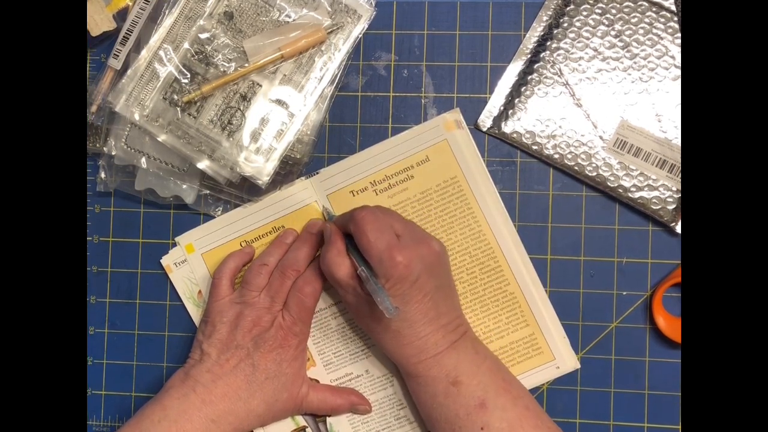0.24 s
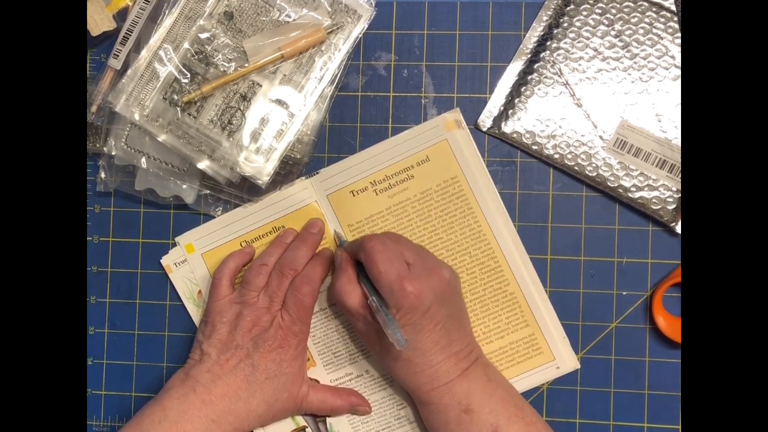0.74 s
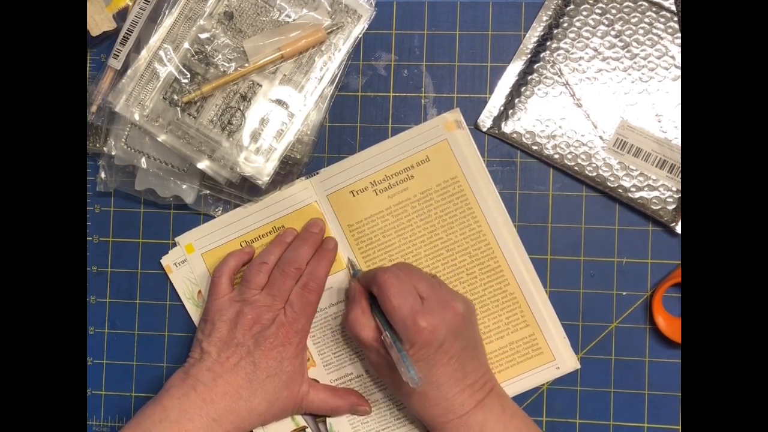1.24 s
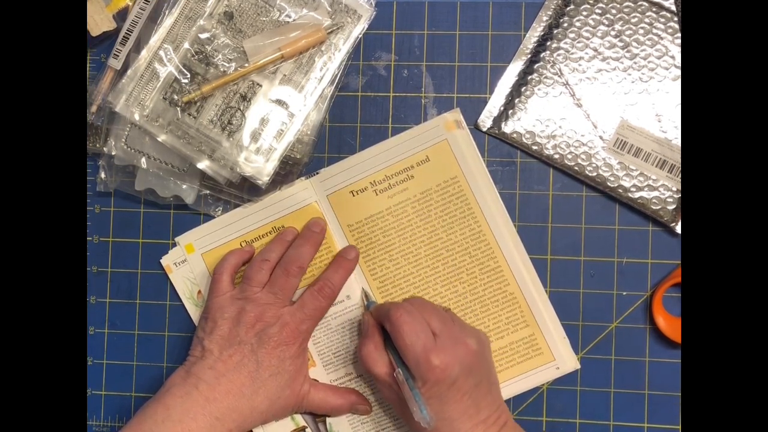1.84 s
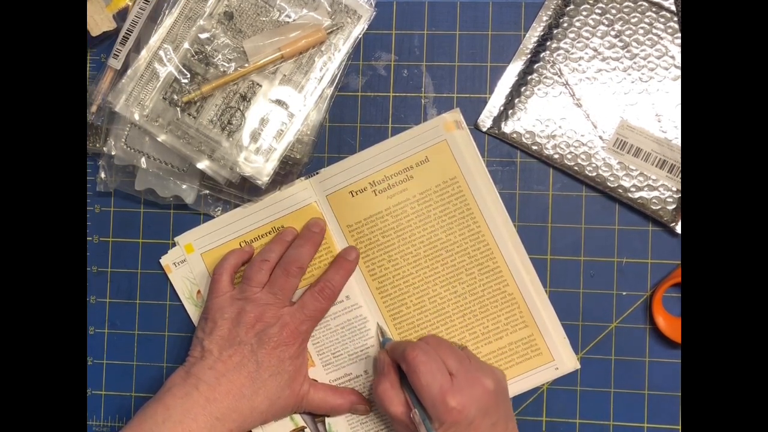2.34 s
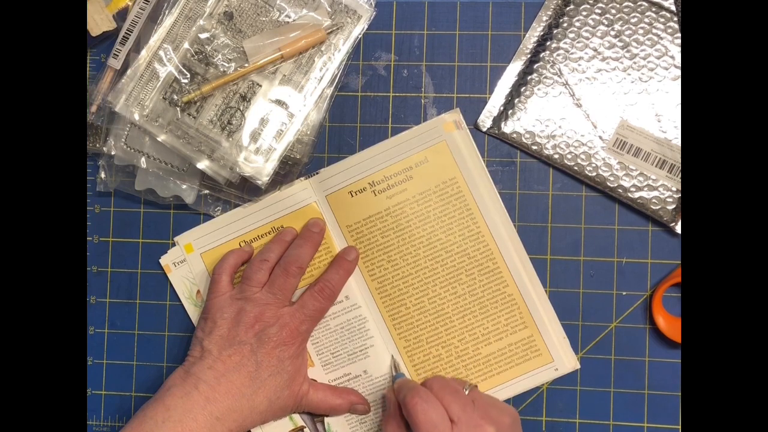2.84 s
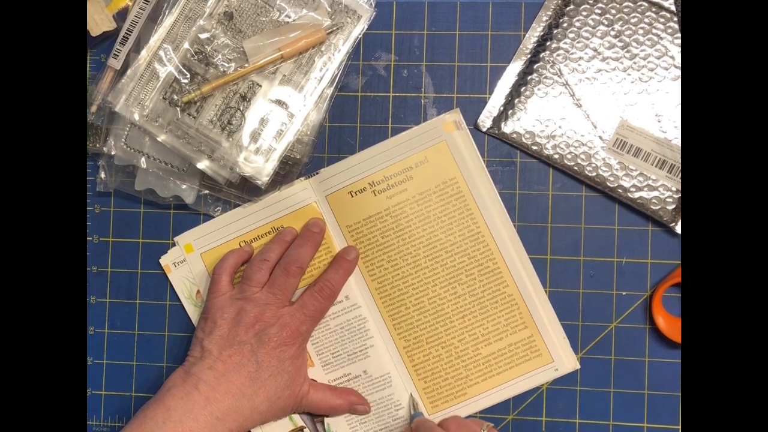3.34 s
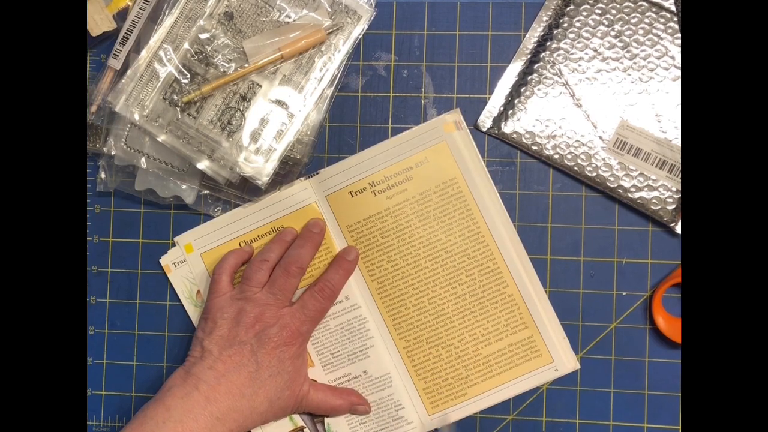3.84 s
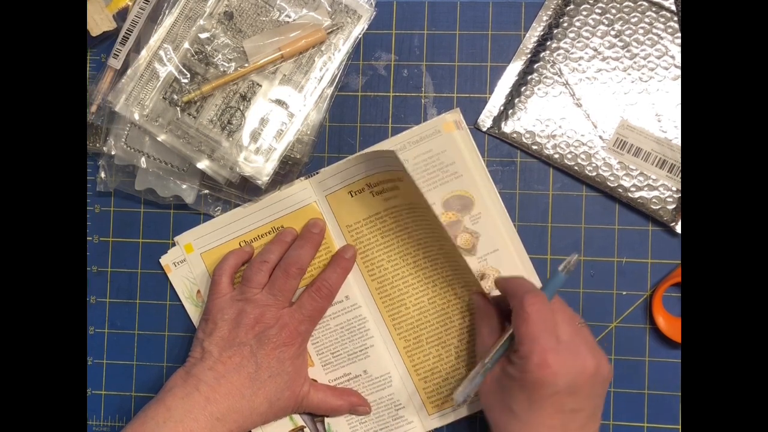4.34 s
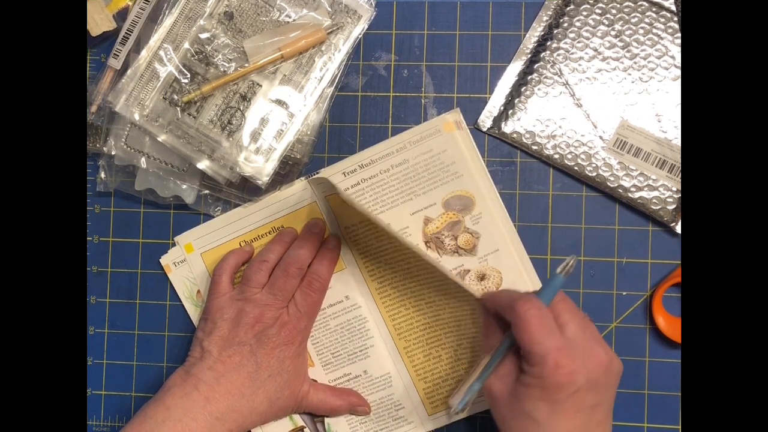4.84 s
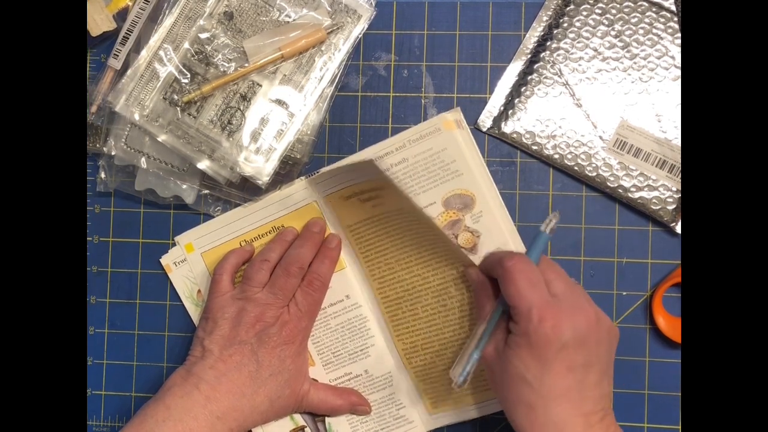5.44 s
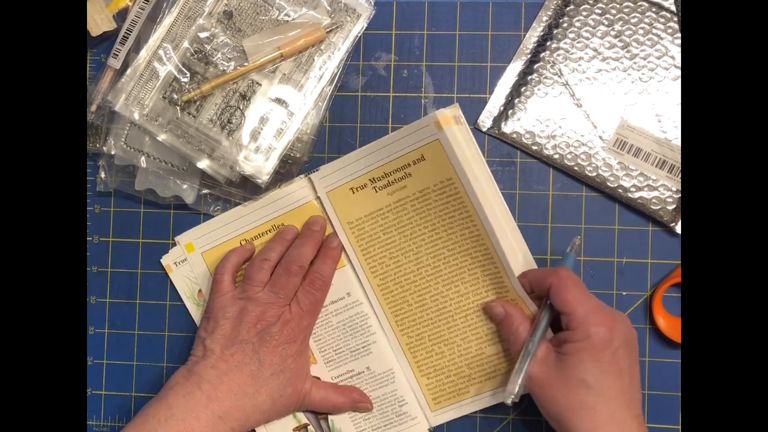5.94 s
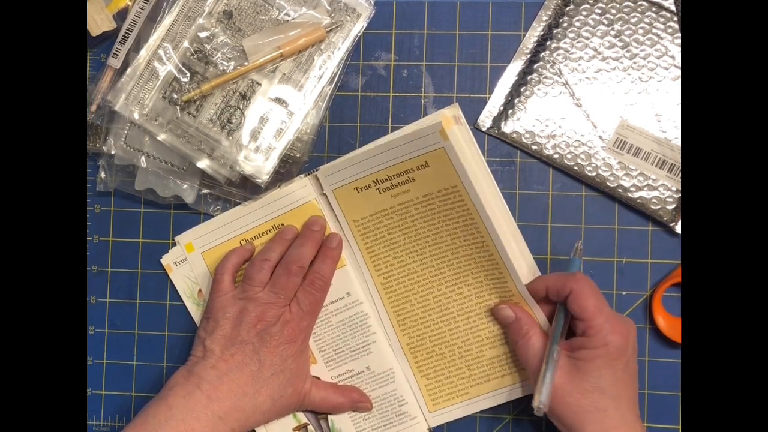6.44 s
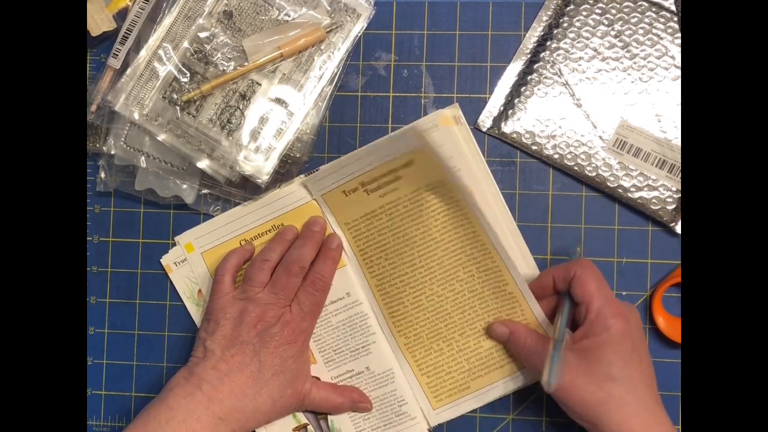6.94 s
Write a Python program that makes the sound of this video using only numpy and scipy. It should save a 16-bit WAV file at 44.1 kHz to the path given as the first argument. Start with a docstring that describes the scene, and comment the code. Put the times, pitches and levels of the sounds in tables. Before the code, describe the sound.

A small craft knife is drawn down the fold of an open book, heard through one close microphone at a desk in a quiet room with a faint low rumble. For the first half second the blade judders rapidly against the paper, ending in a sharp tick. It then scrapes and hisses softly and unevenly through the fibres, with scattered small ticks and a clearer one near 2.7 seconds. The cut thins out and ends with a click at about 3.8 seconds. From around 4.2 seconds a hand lifts and bends the page, making short sliding rustles and crisp crackles. The loudest sound is a sharp paper snap at about 5.4 seconds, followed by fading rustles. A few light taps and a click come between 6 and 6.5 seconds, then a last brief flurry of crinkling around 7 seconds.

```python
"""A desk in a quiet room with a low rumble, heard through one close microphone.
A small knife is drawn down the fold of an open book: stick-slip friction makes it judder at first,
then it scrapes and hisses through the paper fibres with a few ticks. The hand lifts, bends and drops
the page, which rustles as it slides and snaps as its creases give way."""
import sys
import numpy as np
from scipy import signal
from scipy.fft import rfft, irfft
from scipy.io import wavfile
from scipy.ndimage import uniform_filter1d

SR = 44100
rng = np.random.default_rng(int(sys.argv[2]) if len(sys.argv) > 2 else 0)


def int16_out(signal):
    """Quantize to a 16-bit WAV file."""
    q = np.round(np.clip(np.atleast_2d(signal).T, -1, 1) * 32767)
    wavfile.write(sys.argv[1], SR, q.astype(np.int16))


N = 317520


def gain_of(db):
    """Amplitude ratio of a level in decibels."""
    return 10 ** (np.asarray(db) / 20)


def unit_rms(x):
    """Normalisation to unit mean power."""
    return x / np.sqrt(np.mean(x ** 2) + 1e-20)


def at_frequency(points, hz):
    """Interpolation on a logarithmic frequency axis."""
    f, value = np.transpose(points)
    return np.interp(np.log(hz + 1), np.log(f + 1), value)


def at_samples(rows):
    """Linear interpolation in time of each column after the first."""
    times, *columns = np.transpose(rows)
    return [np.interp(np.arange(N) / SR, times, column) for column in columns]


def coloured(x, gain):
    """Zero-phase filtering by a gain that is a function of frequency."""
    return irfft(rfft(x) * gain(np.fft.rfftfreq(len(x), 1 / SR)), len(x))


def patches(shape, bins, frames):
    """A correlated random field over frequency and time, rms 1: resonances that come and go."""
    field = rng.standard_normal(shape[::-1]).T
    for _ in range(2):
        field = uniform_filter1d(uniform_filter1d(field, bins, 0), frames, 1)
    return unit_rms(field)


def wavering(spread_db, over_s):
    """Random amplitude modulation: a slowly varying log-normal gain."""
    return gain_of(spread_db * patches((1, N), bins=1, frames=max(round(over_s * SR / 2), 1))[0])


def friction_noise(spread_db, grain_s):
    """Friction noise: its strength jumps from grain to grain as fibres catch and let go."""
    jumps = uniform_filter1d(rng.standard_normal(N), max(round(grain_s * SR), 1))
    return unit_rms(rng.standard_normal(N) * gain_of(spread_db * unit_rms(jumps)))


# Background spectrum: f/Hz, relative density level/dB
AIR_SPECTRUM = [(16, -33.5), (28, -5.5), (124, 2.5), (228, -8.5), (378, -8), (506, -14), (735, -16),
                (933, -19.5), (1910, -19.5), (2850, -27), (3340, -24.5), (5830, -29.5), (6490, -26),
                (12300, -33.5), (16000, -25.5)]
def air():
    """Stationary coloured noise: room rumble and microphone hiss."""
    noise = coloured(rng.standard_normal(N), lambda hz: gain_of(at_frequency(AIR_SPECTRUM, hz)))
    return gain_of(-64) * unit_rms(noise)


# Reverberation time of the room: f/Hz, T60/s
ROOM_DECAY = [(300, 0.45), (1000, 0.17), (5000, 0.11), (15000, 0.13)]
def room(x):
    """Reverberation: sparse reflections of random sign decay exponentially, each band at its own rate."""
    echoes = np.zeros(SR // 2)
    at = np.arange(150, len(echoes) - 8, 8)
    echoes[at + rng.integers(0, 8, len(at))] = rng.choice([-1., 1.], len(at))
    hz, t, spectrum = signal.stft(echoes, SR, nperseg=256)
    decay = gain_of(-60 * t / at_frequency(ROOM_DECAY, hz)[:, None])
    tail = signal.istft(spectrum * decay, SR, nperseg=256)[1]
    return gain_of(-10) * signal.oaconvolve(x, tail / np.linalg.norm(tail))[:N]


# Response of a bent page: f/Hz, relative level/dB
PAGE_SPECTRUM = [(88, -57.5), (150, 0.5), (303, 0), (398, 6), (504, -1.5), (689, 5.5), (1120, 3),
                 (1500, -8), (1940, -0.5), (2400, -7), (3200, -7), (3900, -5.5), (4800, -9.5),
                 (15100, -7.5), (16000, -36)]
# Centres of its low, middle and high bands: f/Hz
PAGE_BANDS = (840, 3730, 8600)
def page_bands(x, ring_hz=2000., ring_db=0., treble_db_per_octave=0.):
    """Source-filter model: the page and one resonance colour x, split into three bands of rms 1."""
    def response(hz, band):
        resonance_db = ring_db / (1 + (3 * (hz / ring_hz - 1)) ** 2)
        treble_db = treble_db_per_octave * np.log2(1 + hz / 5000)
        share = np.interp(np.log(hz + 1), np.log(PAGE_BANDS), np.eye(3)[band]) ** 0.91
        return gain_of(at_frequency(PAGE_SPECTRUM, hz) + resonance_db + treble_db) * share
    return [unit_rms(coloured(x, lambda hz: response(hz, band))) for band in range(3)]


def band_levels(brightness, falloff_db):
    """Spectral tilt: levels in dB of the three bands; brightness -1 favours the low, +1 the high."""
    return [-falloff_db * (band - brightness) ** 2 for band in (-1, 0, 1)]


# Strokes of the hand on the page: start t/s, end t/s, start level/dB, end level/dB, brightness
STROKES = [(3.894, 4.017, -67, -73.5, 0.62), (4.088, 4.239, -68, -69.5, 0.37),
           (4.232, 4.27, -57, -52.5, 0.0089), (4.269, 4.309, -50, -57, -0.037),
           (4.313, 4.357, -57, -57.5, 0.25), (4.362, 4.405, -60.5, -55, 0.14),
           (4.409, 4.438, -52, -48, -0.1), (4.426, 4.477, -52, -55.5, -0.26),
           (4.47, 4.541, -58, -62, -0.23), (4.56, 4.674, -68, -58, -0.55),
           (4.689, 4.825, -72.5, -63.5, 0.025), (4.829, 4.888, -59.5, -51, 0.021),
           (4.879, 4.965, -49.5, -82, 0.17), (4.966, 5.05, -60.5, -62.5, 0.18),
           (5.047, 5.127, -58, -58.5, -0.034), (5.133, 5.182, -56.5, -54.5, -0.25),
           (5.187, 5.352, -57, -77.5, -0.47), (5.343, 5.429, -73, -66.5, -0.096),
           (5.433, 5.605, -39.5, -71, -0.41), (5.594, 5.683, -55, -63, 0.2),
           (5.687, 5.748, -62, -58.5, -0.038), (5.754, 5.771, -54.5, -52.5, 0.21),
           (5.774, 5.819, -49, -61, -0.75), (5.816, 5.88, -59.5, -62, -0.077),
           (5.911, 5.94, -60, -71, -0.21), (5.958, 6.087, -71, -67.5, 0.0052),
           (6.308, 6.791, -73, -70, -0.59), (6.795, 6.851, -60, -61, 0.29), (6.853, 6.92, -70, -63, -0.043),
           (6.916, 7.03, -60, -62, 0.049)]
def handling():
    """Envelopes of the hand's excitation: gain and brightness, nearly silent between strokes."""
    db, brightness = np.full(N, -100.), np.zeros(N)
    for start, end, start_db, end_db, bright in STROKES:
        span = slice(round(start * SR), round(end * SR))
        db[span] = np.linspace(start_db, end_db, span.stop - span.start)
        brightness[span] = bright
    return uniform_filter1d(gain_of(db), size=200), uniform_filter1d(brightness, size=200)


def rustle():
    """Sliding friction excites the page, whose hollows change their resonances as it bends."""
    gain, brightness = handling()
    spectrum = signal.stft(friction_noise(spread_db=1.4, grain_s=0.0037), nperseg=256)[2]
    hollows = gain_of(2.4 * patches(spectrum.shape, bins=3, frames=10))
    bent = signal.istft(spectrum * hollows, nperseg=256)[1][:N]
    levels_db = band_levels(brightness, falloff_db=7)
    sound = sum(gain_of(db) * band for db, band in zip(levels_db, page_bands(bent)))
    return gain * wavering(spread_db=1.37, over_s=0.02) * sound  # the page slides in fits


def crackles(per_s=26, above_stroke_db=12.5):
    """A Poisson process of small snaps, each as strong as the hand's stroke allows."""
    gain, brightness = handling()
    waits, pitches, weaknesses = rng.random((300, 3)).T
    onsets = (STROKES[0][0] * SR + np.cumsum(-np.log(1 - waits)) * SR / per_s).astype(int)
    return snaps([(i / SR, 20 * np.log10(gain[i]) + above_stroke_db - 8 * weak,
                   brightness[i], 1200 * 4 ** pitch)
                  for i, pitch, weak in zip(onsets, pitches, weaknesses) if i < N])


# Pitched taps of page and book: t/s, peak level/dB, f/Hz, T60/s
PAPER_TAPS = [(.515, -20.5, 5060, 0.0037), (0.557, -48, 1120, 0.011), (0.5592, -32.5, 800, 0.015),
              (.571, -51, 785, 0.007), (0.932, -46, 1430, 0.015), (2.3688, -34, 6960, .004),
              (2.9241, -44.5, 1690, .008), (3.749, -34.5, 1850, 0.006), (4.3675, -42, 3360, .007),
              (5.4364, -22, 1135, 0.032), (5.715, -40.5, 940, 0.019), (5.7914, -42, 1015, 0.018),
              (6.1533, -39, 750, .014), (6.251, -42, 1820, 0.012), (6.2665, -47, 800, 0.0067),
              (6.8527, -32.5, 1970, 0.0081), (6.9265, -42, 890, 0.013), (6.937, -42.5, 975, .016),
              (7.0003, -41, 3760, 0.0073)]
def taps(sag=0.039, mode_spacing=0.23, rise_cycles=1.2):
    """Damped free vibration: a soft blow rings two modes of a small patch, sagging in pitch."""
    out, t = np.zeros(N + 2048), np.arange(2048) / SR
    draws = rng.uniform(-1, 1, (len(PAPER_TAPS), 2))
    for (start, peak_db, hz, t60), (side, offset) in zip(PAPER_TAPS, draws):
        phase = 2 * np.pi * hz * t * (1 + sag * (1 - t / t60))
        neighbour = 0.95 * np.sin((1 + mode_spacing * np.sign(side)) * phase + np.pi * offset)
        rise = np.sin(np.pi / 2 * np.minimum(hz * t / rise_cycles, 1)) ** 2
        sound = (np.sin(phase) + neighbour) * rise * gain_of(-60 * t / t60)
        out[round(start * SR):][:2048] += gain_of(peak_db) * sound / np.abs(sound).max()
    return out[:N]


# Blade ticks and page snaps: t/s, peak level of the strongest band/dB, brightness, f/Hz
PAPER_SNAPS = [(.515, -21.5, 1.16, 6500), (.7113, -49, 3, 14000), (.7402, -45, 1.5, 13500),
               (.7886, -59, 0.5, 7400), (.7915, -46, 1.5, 14000), (.9635, -50, 4, 7500),
               (.969, -49, 1.5, 9500), (1.3284, -45.5, 4, 8100), (1.3738, -43.5, 3, 7600),
               (1.6357, -46.5, 3, 7700), (1.696, -46, 2, 4200), (1.8976, -51.5, 0, 900),
               (2.2488, -42, 2, 7360), (2.3688, -36, 0.3, 3700), (2.5755, -47, 4, 14200),
               (2.729, -24, 2, 13000), (2.7517, -42.5, 0.5, 1450), (2.7856, -50, 0.5, 2500),
               (2.9246, -38, 0.75, 6800), (3.7488, -25, 4, 1840), (3.7505, -40, -0.5, 720),
               (3.764, -53, 2.5, 1300), (3.8396, -47, 0.6, 3870), (3.8611, -51.5, 0.5, 830),
               (3.9145, -42.5, 6, 6400), (4.1018, -41.5, 0, 1300), (4.1999, -45, 0.36, 2290),
               (4.2874, -58, 2.5, 1500), (4.3667, -35, -0.04, 3260), (4.393, -41, 0, 4300),
               (4.4112, -42, -0.1, 3260), (4.4283, -32, -0.05, 1209), (4.4799, -31.5, -0.2, 1290),
               (4.5055, -35, -0.04, 1920), (4.5217, -41.5, 0, 1620), (4.562, -42.5, 0, 1120),
               (4.594, -43, -0.5, 1100), (4.6041, -38.5, 0.03, 1980), (4.5875, -53, -1, 1200),
               (4.6265, -48, -5, 1500), (4.6488, -40.5, -0.3, 1088), (4.6714, -53, 3, 1140),
               (4.6937, -52.5, -0.5, 1160), (4.7351, -51, -0.5, 2040), (4.7965, -60, -5, 6340),
               (4.8473, -29, 0.5, 2930), (4.8613, -47, -0.9, 2830), (4.8663, -26.5, 0.5, 2900),
               (4.8876, -42.5, 0, 2755), (4.9165, -50, 1, 4000), (4.9683, -37, 2, 6000),
               (4.996, -44.5, 0, 3040), (5.0858, -36.5, 0.4, 1860), (5.2082, -30, 0, 1310),
               (5.3497, -46.5, -0.2, 1100), (5.3775, -41.5, 0.5, 4170), (5.393, -37, 0.3, 1860),
               (5.4045, -38, -0.25, 1490), (5.415, -42.5, 0, 9000), (5.4349, -13, 0.86, 4400),
               (5.4355, -20, 1, 14000), (5.4375, -17, 1.2, 4400), (5.4526, -15.5, 0.1, 2570),
               (5.4535, -24, 2, 11000), (5.4894, -33.5, 0.5, 1570), (5.5996, -40, 0.5, 4150),
               (5.7594, -37.5, 0, 1100), (5.7766, -39, -0.8, 1200), (5.7804, -32.5, 0.1, 1950),
               (5.8168, -45, .5, 1092), (6.0397, -42, 0.9, 800), (6.152, -48.5, -0.1, 2000),
               (6.2496, -52.5, -0.2, 4500), (6.2653, -47.5, 0.25, 1980), (6.5082, -31.5, 0.94, 3800),
               (6.7044, -48.5, 0.5, 1993), (6.799, -53, 0, 1200), (6.8072, -36, 0.1, 3030),
               (6.8545, -47.5, -0.5, 900), (6.8955, -55, 6, 12000), (6.9175, -46, 5, 11000),
               (6.9245, -39.5, -1, 1620), (6.9505, -43, 1.5, 3500), (6.977, -36.5, 0.8, 2000),
               (6.9885, -40, 3, 8000), (6.9992, -32, 1.1, 3600), (7.028, -50, -1.5, 2000),
               (7.0348, -43, 0, 1930), (7.074, -51, 1.5, 13000)]
def snaps(rows):
    """Impulsive release: a crease gives way with a crack and a resonant burst; low bands are slower."""
    out, t = np.zeros(N + 4096), np.arange(4096) / SR
    rises_s, decay_scales = (.0016, .0006, .00031), (1.75, 1.12, .62)  # low, middle, high band
    crack = 5 * (np.arange(4096) == 24)
    bursts = rng.standard_normal((300, 4096)) + crack
    for (start, peak_db, brightness, hz), burst in zip(rows, bursts):
        t60 = 0.016 * (1000 / hz) ** .28  # higher snaps die sooner
        falloff_db = max(11 - 0.075 * (peak_db + 50), 1)  # louder snaps are broader
        levels_db = band_levels(brightness, falloff_db)
        ring_db = 12 * min(hz / 1800, 1)  # lower snaps ring less
        bands = page_bands(burst, hz, ring_db, treble_db_per_octave=-0.5)
        for band, db, rise_s, scale in zip(bands, levels_db, rises_s, decay_scales):
            decay_db = -60 * t / (scale * t60)
            faint_tail = gain_of(-22 + 0.42 * decay_db)
            sound = band * (1 - np.exp(-t / rise_s)) * (gain_of(decay_db) + faint_tail)
            peak = gain_of(peak_db + db - max(levels_db))
            out[round(start * SR):][:4096] += peak * sound / np.abs(sound).max()
    return out[:N]


# Modes of the book: f/Hz, bandwidth/Hz, level/dB
BOOK_MODES = [(380, 300, -9), (654, 90, -4.5), (741, 91, 1.5), (820, 110, -11), (1307, 330, 1),
              (1850, 280, -7), (2810, 140, -5.5), (4480, 410, -7)]
def book(force, modes=slice(None), damping_hz=0):
    """Modal superposition with dispersion: bending waves carry the low modes more slowly."""
    response = np.zeros(2000)
    for hz, width_hz, db in BOOK_MODES[modes]:
        travel_s = 0.09 / np.sqrt(hz)
        t = np.maximum(np.arange(2000) / SR - travel_s, 0)
        decay = np.exp(-np.pi * (width_hz + damping_hz) * t)
        response += gain_of(db) * decay * np.sin(2 * np.pi * hz * t)
    return signal.oaconvolve(force, response)[:N]


# Progress of the juddering blade: t/s, slips so far
SLIP_COUNT = [(.0038, 0), (.0646, 3), (.1716, 9), (.2572, 14), (.4573, 26), (.54, 31.1)]
def judder(level_db=-49.5, spread_db=.8, jitter_s=.0004):
    """Stick-slip oscillation: the blade kicks the book about fifty, then sixty times a second."""
    slips = at_samples(SLIP_COUNT)[0]
    times = np.append(SLIP_COUNT[0][0], np.flatnonzero(np.diff(slips // 1)) / SR)
    lateness, strength = rng.standard_normal((len(times), 2)).T
    kicks = np.zeros(N)
    kicks[((times + jitter_s * lateness) * SR).astype(int)] = gain_of(level_db + spread_db * strength)
    return book(kicks, damping_hz=140)  # the pressing hand widens every mode


def drag(low_db, upper_db):
    """Forced vibration: the dragging blade shakes the book, less while it sticks."""
    slips = at_samples(SLIP_COUNT)[0]
    stuck = slips % 1 * (np.arange(N) < SLIP_COUNT[-1][0] * SR)  # rises from 0 to 1 between slips
    force = friction_noise(spread_db=1.6, grain_s=0.006) * gain_of(-12 * stuck)
    low = unit_rms(book(force, modes=slice(0, 4)))
    upper = unit_rms(book(force, modes=slice(4, 6)))
    return gain_of(low_db) * low + gain_of(upper_db) * upper


# Spectrum of the edge in the paper: f/Hz, relative level/dB
EDGE_SPECTRUM = [(1180, -47), (2000, -1.5), (2960, -7), (4080, -3.5), (4700, -9), (6200, -6), (7510, -5),
                 (16000, -4)]
# Bands that swell, glide and fade: start t/s, end t/s, start f/Hz, end f/Hz, peak boost/dB
GLIDING_BANDS = [(1.7, 0.93, 4150, 4320, 18), (0.5, 3.9, 2740, 2400, 8), (-1, 2, 3450, 3210, 5),
                 (1, 0.61, 11300, 10900, 8), (0.9, 1.11, 7200, 7200, 12), (0.5, 1.7, 9200, 10400, 5),
                 (.9, 1.56, 5600, 10900, 6), (0, 1.6, 14900, 14600, 9), (1, 2.57, 7900, 7000, 10.5),
                 (1.5, 1.6, 4000, 4000, 6), (2.5, 2.18, 4400, 3700, 13), (1.5, 2.8, 8900, 10000, 6),
                 (-0.6, 2.1, 15400, 15000, 5), (0.9, 2.67, 3900, 3400, 10), (2.5, 2.85, 13000, 19000, 7),
                 (2.5, 3.1, 7000, 6770, 11), (2.9, 3.6, 9000, 10800, 9.5), (3, 3.9, 13000, 12500, 7),
                 (3, 4.4, 12500, 13500, 5), (2.5, 3.8, 10700, 11500, 8.5), (3.2, 3.7, 7000, 7500, 7.5)]
def edge(scrape_db, hiss_db):
    """Filtered friction noise: the edge scrapes and fibres hiss, in bands that drift as the hand moves."""
    hz, t, spectrum = signal.stft(friction_noise(spread_db=1.85, grain_s=0.0011), SR, nperseg=512)
    hz, at = hz[:, None], np.minimum(t * SR, N - 1).astype(int)
    hiss_share = np.clip((hz - 5000) / 6000, 0, 1)
    shape_db = at_frequency(EDGE_SPECTRUM, hz) + (1 - hiss_share) * scrape_db[at]
    shape_db += hiss_share * hiss_db[at]
    shape_db += (.7 + 1.1 * hiss_share) * patches(spectrum.shape, bins=4, frames=45)
    for start, end, from_hz, to_hz, db in GLIDING_BANDS:
        progress = np.clip((t - start) / (end - start), 0, 1)
        centre_hz = from_hz + (to_hz - from_hz) * progress
        width_hz = 300 + .03 * centre_hz
        swell = np.sqrt(abs(np.sin(np.pi * progress)))
        shape_db += db * swell / (1 + (2 * (hz - centre_hz) / width_hz) ** 4)
    return signal.istft(spectrum * gain_of(shape_db) * (hz > 2100), SR, nperseg=512)[1][:N]


# Course of the cut: t/s, low-mode level/dB, upper-mode level/dB, scrape level/dB, hiss level/dB
CUT_LEVELS = [(0, -58, -59.5, -63, -63.5), (.32, -58.5, -61, -58, -61.5), (.5, -56.5, -63, -58, -63),
              (.6, -67, -67.5, -59.5, -61), (.75, -66, -73, -59, -61), (.86, -73, -74, -61.5, -63),
              (.97, -64, -68.5, -63, -61), (1.25, -65.5, -66.5, -62.5, -61.5),
              (1.55, -68, -72.5, -67.5, -65), (1.87, -62, -69, -64, -62), (2.1, -65.5, -70.5, -65.5, -61.5),
              (2.27, -63, -65, -62, -60), (2.52, -67.5, -71, -67, -63.5), (2.75, -65.5, -67.5, -63, -66),
              (2.95, -72, -70.5, -65.5, -65), (3.2, -73.5, -86, -68, -68.5),
              (3.55, -78.5, -75.5, -62.5, -66), (3.76, -68, -69, -59, -63)]
def cut():
    """Sliding friction of the knife: edge noise and drag add, until the blade leaves the paper."""
    low_db, upper_db, scrape_db, hiss_db = at_samples(CUT_LEVELS)
    sound = edge(scrape_db, hiss_db) + drag(low_db, upper_db)
    spurts = wavering(spread_db=1.1, over_s=0.04)  # the blade advances unevenly
    in_paper = np.arange(N) < CUT_LEVELS[-1][0] * SR
    return sound * spurts * in_paper


def scene():
    """Linear superposition of the sources; only snaps, crackles and taps reverberate."""
    transients = snaps(PAPER_SNAPS) + crackles() + taps()
    return (judder() + transients + room(transients) + cut() + rustle() + air())[None]


def record(dry):
    """Band limiting: the small microphone drops the deepest bass, and a low-pass ends the treble."""
    thin = signal.sosfilt(signal.butter(2, 42, "high", fs=SR, output="sos"), dry)
    low_pass = signal.firwin(511, 16000, window=("kaiser", 9), fs=SR)
    return signal.oaconvolve(thin, low_pass[None], "same")


dry = scene()
out = record(dry)
int16_out(out)
```